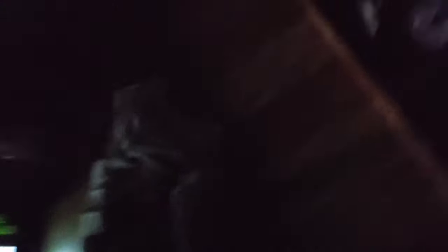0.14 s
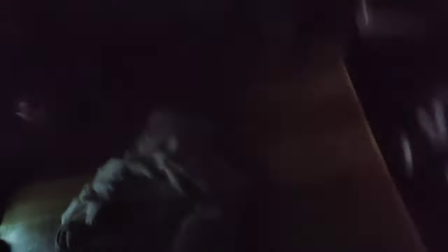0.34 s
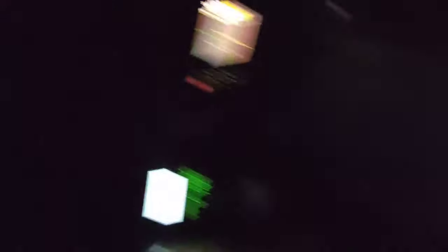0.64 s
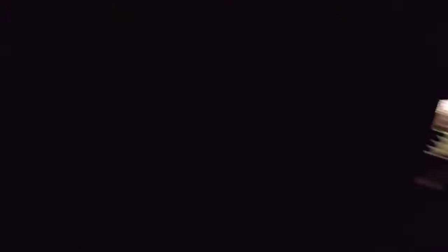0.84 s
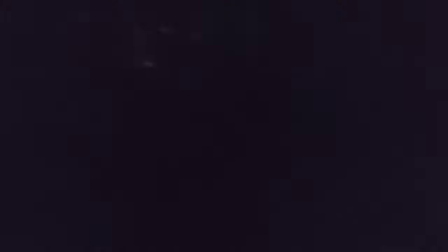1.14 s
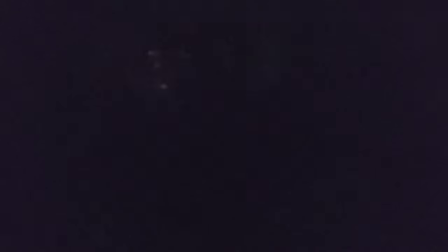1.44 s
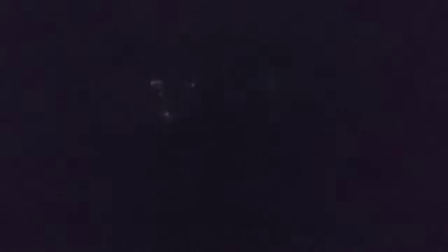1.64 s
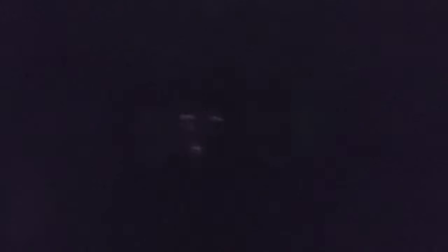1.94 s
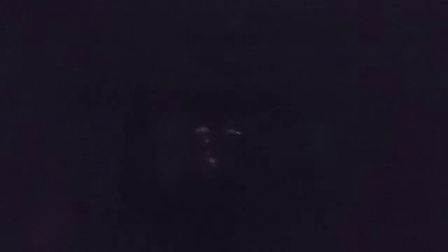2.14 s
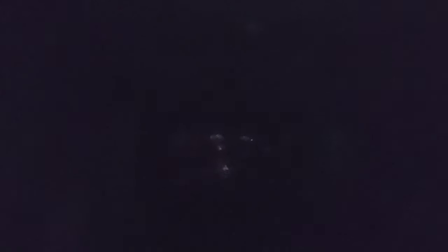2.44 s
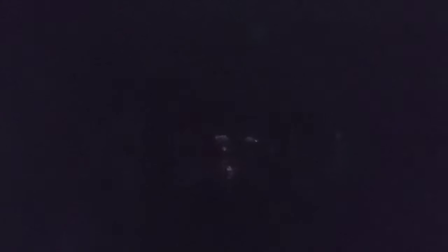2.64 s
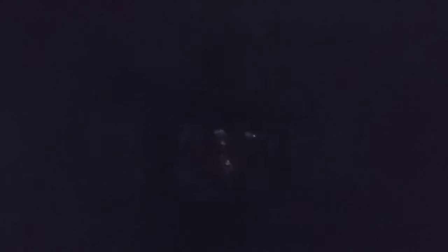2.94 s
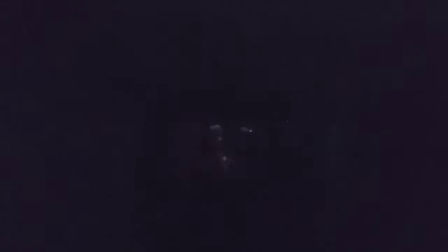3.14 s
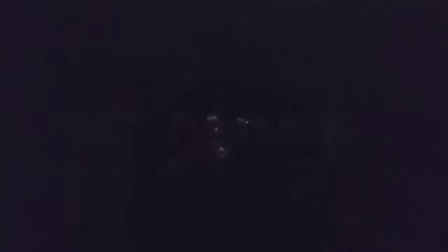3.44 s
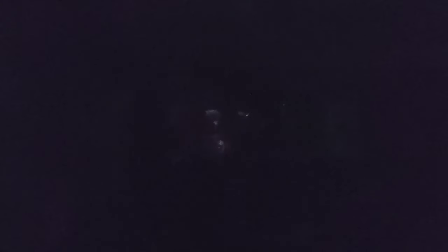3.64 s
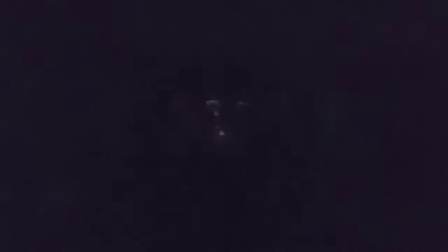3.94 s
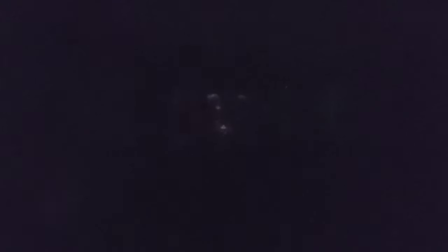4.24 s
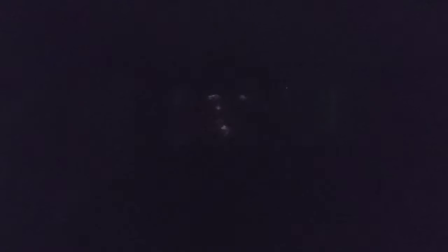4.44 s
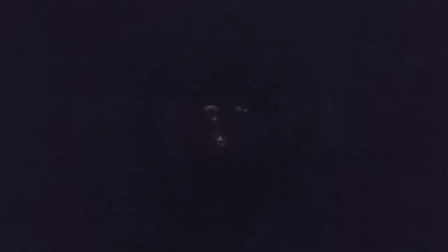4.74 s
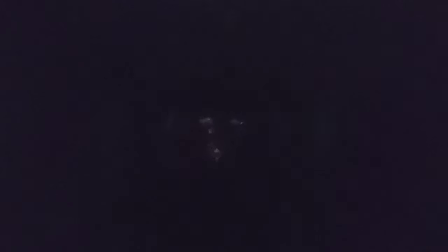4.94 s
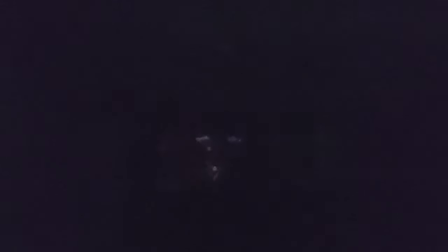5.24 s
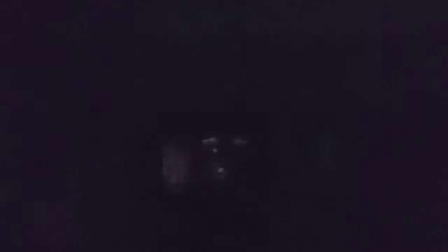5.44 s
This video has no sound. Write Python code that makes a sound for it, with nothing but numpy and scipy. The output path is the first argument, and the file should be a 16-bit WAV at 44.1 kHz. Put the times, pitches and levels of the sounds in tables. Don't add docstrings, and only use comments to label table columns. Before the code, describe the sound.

A heavy diesel drone fills a boat's wheelhouse at night, its low hum rising and sinking under gear whine and engine-room roar.

```python
import sys
import numpy as np
from scipy import signal
from scipy.io import wavfile
from scipy.ndimage import uniform_filter1d

SR = 44100
rng = np.random.default_rng(int(sys.argv[2]) if len(sys.argv) > 2 else 0)


def master(y):
    cut = np.clip(np.atleast_2d(y).T, -1, 1)
    pcm = np.round(cut * 32767)
    wavfile.write(sys.argv[1], SR, pcm.astype(np.int16))


def decibels_to_gain(level_db):
    exponent = np.asarray(level_db, float) / 20
    return 10 ** exponent


N = 246959
T = np.arange(N) / SR

CYCLE_HZ = 9.803
MESH_HZ = 196.1
PUMP_HZ = 195.7
SHAFT_WOBBLE_HZ = 3

# time in seconds, level in dB.
HULL_LEVEL = [(0, -23), (.26, -23), (.44, -33.5), (.8, -20.5), (1.38, -22.5), (1.54, -34), (1.68, -19.5),
              (2.24, -22), (2.4, -19), (2.82, -15.5), (3.08, -24.5), (3.22, -20), (3.45, -31.5),
              (3.85, -34), (4.2, -22), (4.78, -15), (5.18, -32.5), (5.32, -22)]
# time in seconds, pitch in Hz.
HULL_PITCH = [(0, 117.8), (.26, 117.8), (.44, 115.9), (.84, 117.3), (1.54, 118.3), (1.68, 118.2),
              (2.24, 116.5), (2.4, 117.4), (2.82, 117.7), (3.08, 117.6), (3.45, 118.8), (3.85, 116.6),
              (4.2, 117.4), (4.78, 117.45), (5.18, 118), (5.34, 117.3)]
STRONG_ORDER_DB = [-31, -31.5, -40]
# time in seconds, half length in seconds, # change in dB.
FLEX_9 = [
    (0.194, .3, -12),
    (0.71, 0.076, 7),
    (1.5, 0.32, 2.5),
    (3.775, .1, 3.5),
    (4.2, 0.066, 7.5),
    (5.05, 0.22, -11),
    (5.404, 0.17, 6.5),
]
FLEX_14 = [
    (.4, .65, -6),
    (1.68, 0.051, 6.5),
    (2.15, 0.16, 5.5),
    (3.02, 0.14, -15),
    (4.06, .08, 1),
]
FLEX_18 = [
    (.3, 0.48, 12.5),
    (.98, 0.093, -6),
    (2.15, 0.11, 10),
    (2.68, .35, -13),
    (3.32, 0.16, 9),
    (4.27, .12, 5.5),
]
# order, left level in dB, right level in dB.
WEAK_ORDERS = [(5.01, -55, -52), (6, -39.5, -40), (7, -41, -42.5), (7.9, -39, -39), (9.75, -43, -48.5),
               (11, -42, -38), (12.9, -43.5, -35), (14.6, -41, -42), (16.1, -52.5, -43), (17, -49, -51.5),
               (19.9, -59.5, -56.5), (21.7, -55.5, -37), (24.45, -46, -47.5), (24.4, -44.5, -42.5),
               (35, -45, -45), (41.6, -48.5, -53), (53.5, -45, -43.5), (56, -42, -50.5),
               (62.76, -43.5, -49), (66.1, -47.5, -46.5), (67.53, -50.5, -45.5), (68.55, -44, -44)]
# time in seconds, level in dB at the right port.
PANEL_LEVEL = [(0, -60), (.6, -50), (1.35, -43), (1.55, -35), (2.3, -31.5), (3.3, -31), (4, -34),
               (4.8, -29), (5.6, -34)]

# multiple of the gear rate, left level in dB, right level in
# dB.
GEAR_TONES = [(11, -59, -85), (12, -81, -59), (13, -64, -57), (15, -56, -77)]
GEAR_SONG_DB = [-40.5, -50, -41.5]
# time in seconds, half length in seconds, change in dB.
SONG_11 = [
    (0, 0.36, -18),
    (.85, .1, -19),
    (1.5, .2, -20),
    (1.9, 0.18, 3.5),
    (5.3, 0.13, -10),
    (5.299, 0.61, 4),
]
SONG_12 = [
    (0, 0.24, -15),
    (1.03, 0.054, 15),
    (1.9, 0.18, 4),
    (3.4, .25, -11),
    (5.1, 0.33, 12),
]
SONG_13 = [
    (.3, 0.47, -10.5),
    (1.25, 0.13, 1),
    (2.6, .15, -10),
    (3.35, 1, 1.5),
    (4.45, 0.4, -7),
    (5.4, .45, 6.5),
]

# multiple of the pump beat, left level in dB, right level in dB.
PUMP_TONES = [(22, -62.5, -68), (23, -57.5, -65.5), (24, -60.5, -69), (25, -66, -62), (26, -60, -58),
              (27, -60.5, -63), (28, -56.5, -66), (29, -56.5, -63), (30, -52, -66), (31, -62, -66),
              (32.7, -65, -78)]

# time in seconds, second multiple in Hz.
WHISTLE_PITCH = [(0, 6870), (.45, 6830), (1.1, 6835), (1.6, 6885), (1.85, 6865), (2.4, 6860), (3.05, 6830),
                 (3.22, 6875), (3.9, 6825), (4.6, 6840), (4.75, 6890), (4.9, 6850), (5.25, 6835),
                 (5.6, 6850)]
WHISTLE_DB = [-46, -59.5]
# time in seconds, half length in seconds, change in dB.
LEFT_FADES = [
    (0, 0.055, 9),
    (.45, .06, 9),
    (1.75, .3, -4),
    (3.14, 0.072, -8),
    (3.36, .05, -10),
    (3.68, .08, -22),
    (4.6, .2, -8),
    (4.98, .12, -9),
]
# time in seconds, half length in seconds, change in dB.
RIGHT_FLARES = [
    (.72, 0.088, 12),
    (1.3, .15, 7),
    (2.3, .1, -6),
    (2.97, .09, 8),
    (3.55, .1, 8),
    (3.81, 0.056, 9),
    (4.2, .2, -16),
    (4.8, 0.095, 5),
    (5.4, .08, 12),
]
# multiple of the shaft rate, left level in dB, right level in dB.
TURBINE_TONES = [(1, -60.5, -60), (3, -60.5, -62), (4, -62.5, -76)]

# time in seconds, peak in dB, pitch in Hz, length in seconds,
# left over right in dB.
TICKS = [
    (0.483, -35, 1548, .03, -1),
    (5.485, -39.5, 6350, 0.0031, 20.5),
]

# frequency in Hz, level in dB per Hz.
ROAR_LEFT = [(30, -62.5), (60, -57.5), (120, -48), (300, -57.5), (380, -54), (650, -58), (1400, -65),
             (2400, -58.5), (4000, -80), (6200, -74), (6900, -77), (8000, -88.5), (12000, -88.5),
             (15300, -89)]
# frequency in Hz, level in dB per Hz.
ROAR_RIGHT = [(30, -63.5), (110, -47.5), (300, -59.5), (380, -52), (700, -57.5), (1500, -66.5),
              (2700, -70.5), (4100, -84), (5700, -82), (7000, -80.5), (8300, -75.5), (11000, -90),
              (13800, -90.5), (15300, -99)]
# frequency in Hz, likeness from 0 to 1.
LIKENESS = [(40, 0.94), (130, 0.57), (290, 0.82), (640, .4), (1410, 0), (15000, 0.01)]

# shading before the swing
# in dB, middle in seconds, half length in seconds.
SWING = [
    (4, 0.88, 0.29),
    (-7, .95, .5),
    (-5.5, 1.92, .2),
    (-4.5, 1.85, .12),
]
# frequency in Hz, row of the swing counted from 1 (0 = never shaded).
SWING_BANDS = [(60, 0), (250, 1), (700, 0), (1500, 0), (2400, 2), (5500, 3), (8500, 0), (11000, 4)]
# frequency in Hz, level in dB per Hz.
FAINT_LIMIT = [(300, -76), (1200, -73), (2600, -83), (3700, -80.5), (4300, -80.5), (5800, -86),
               (7200, -79.5), (8500, -87), (9800, -85), (10600, -83.5), (12800, -83), (14200, -87.5),
               (15000, -86), (15450, -82), (15520, -40)]


def exhaust():
    cycles = CYCLE_HZ * T - .52 + 0.0068 * wander(.5).real
    pitch_hz = columns(HULL_PITCH, T)[0]
    hull_turns = np.cumsum(pitch_hz) / SR - .127
    hull = decibels_to_gain(columns(HULL_LEVEL, T)[0]) * tone(hull_turns, steady=0.99, width_hz=4.8).real
    for order, db, flex in zip((9, 14, 18), STRONG_ORDER_DB, (FLEX_9, FLEX_14, FLEX_18)):
        hull -= decibels_to_gain(db + bumps(flex)) * tone(order * cycles, steady=0.94, width_hz=3.).real
    out = hull * decibels_to_gain(np.array([[-1.1], [.9]]))

    shade = swing(T)
    for order, *db in WEAK_ORDERS:
        steady = 0.74 * np.exp(-(order / 38) ** 2)
        shaded = decibels_to_gain(1.22 * shade_db(shade, np.array([order * CYCLE_HZ])))
        hum = tone(round(order) * cycles, steady, width_hz=1.4 + order / 12).real
        out -= decibels_to_gain(np.array(db))[:, None] * shaded * hum

    panel = decibels_to_gain(columns(PANEL_LEVEL, T)[0]) * tone(72 * CYCLE_HZ * T, steady=0.95, width_hz=13.0)
    left_panel = decibels_to_gain(-14.5) * panel * np.exp(-.8j)
    return out + [left_panel.real, panel.real]


def gears():
    hz = MESH_HZ * (1 + .0008 * wander(5.07).real + .002 * wander(0.802).real)
    out = whine(hz, GEAR_TONES, steady=0.22, width_hz=10)
    turns = np.cumsum(hz) / SR
    for k, db, song in zip((11, 12, 13), GEAR_SONG_DB, (SONG_11, SONG_12, SONG_13)):
        out[0] += decibels_to_gain(db + bumps(song)) * tone(k * turns, steady=0.94, width_hz=11).real
    return out


def pump():
    rocking = 0.0024 * np.cos(4 * np.pi * CYCLE_HZ * T)
    hz = PUMP_HZ * (1 + .002 * wander(2.).real + rocking)
    return whine(hz, PUMP_TONES, steady=.45, width_hz=11.6)


def turbine():
    hz = columns(WHISTLE_PITCH, T)[0] / 2 + SHAFT_WOBBLE_HZ * wander(3.).real
    turns = 2 * np.cumsum(hz) / SR
    left_db = WHISTLE_DB[0] + 2.1 * swing(T)[2] + bumps(LEFT_FADES)
    right_db = WHISTLE_DB[1] + bumps(RIGHT_FLARES)
    second = [decibels_to_gain(db) * tone(turns, steady=0.83, width_hz=20).real for db in (left_db, right_db)]
    return second + whine(hz, TURBINE_TONES, steady=0.6, width_hz=33)


def ticks():
    out = np.zeros((2, N))
    for s, db, hz, length, pan_db in TICKS:
        blip = np.exp(-(2 * (T - s) / length) ** 2) * np.sin(2 * np.pi * hz * T)
        out += decibels_to_gain(db + np.array([[.5], [-.5]]) * pan_db) * blip
    return out


def roar():
    size, hop = 2048, 512
    frames, hz = N // hop + 5, np.fft.rfftfreq(size, 1 / SR)
    a, b, c, d, patches = rng.standard_normal((frames, len(hz), 5)).T
    patches = uniform_filter1d(patches, size=20, axis=0)
    patches = evened(uniform_filter1d(patches, size=8, axis=1))

    same = np.clip(read(LIKENESS, hz), -1, 1)[:, None]
    left = a + 1j * b
    z = np.array([left, same * left + np.sqrt(1 - same ** 2) * (c + 1j * d)])
    shade = swing(np.arange(frames) * hop / SR)
    right_gain = decibels_to_gain(read(ROAR_RIGHT, hz))[:, None]
    deep = hz < 60
    z[0] *= decibels_to_gain(read(ROAR_LEFT, hz)[:, None] + shade_db(shade, hz))
    z[0, deep] = z[1, deep] * right_gain[deep]
    z[1] *= right_gain
    z *= decibels_to_gain(14.0 + 0.65 * patches)
    noise = signal.istft(z, nperseg=size, noverlap=size - hop)[1][:, :N]

    body = signal.sosfiltfilt(signal.butter(2, 2600, fs=SR, output="sos"), noise)
    bass = signal.sosfiltfilt(signal.butter(2, 260, fs=SR, output="sos"), noise)
    breath = 0.092 * np.cos(4 * np.pi * (CYCLE_HZ * T - .25))
    breath += 0.1 * np.cos(2 * np.pi * (CYCLE_HZ * T - .75))
    thumps = 0.32 * np.cos(4 * np.pi * (CYCLE_HZ * T - .02))
    return noise + bass * thumps + body * (breath + 0.044 * wander(11).real)


def whine(hz, tones, steady, width_hz):
    turns, shade, out = np.cumsum(hz) / SR, swing(T), np.zeros((2, N))
    for k, left_db, right_db in tones:
        spin = np.sqrt(2) * np.exp(2j * np.pi * round(k) * turns)
        shaded_db = left_db + shade_db(shade, np.array([k * hz.mean()]))[0]
        out[0] += decibels_to_gain(shaded_db) * (spin * drift(steady, width_hz)).real
        out[1] += decibels_to_gain(right_db) * (spin * drift(steady, width_hz)).real
    return out


def tone(turns, steady, width_hz):
    return np.sqrt(2) * np.exp(2j * np.pi * turns) * drift(steady, width_hz)


def drift(steady, width_hz):
    steady = np.clip(steady, 0, 1)
    return steady + np.sqrt(1 - steady ** 2) * wander(width_hz)


def wander(width_hz):
    step = 64
    size = N // step + 2
    bell = np.exp(-(np.fft.fftfreq(size, step / SR) / width_hz) ** 2)
    z = rng.standard_normal((size, 2)) @ [1, 1j] * bell
    return np.interp(np.arange(N), np.arange(size) * step, evened(np.fft.ifft(z)))


def bumps(rows):
    t = T[::64]
    total_db = sum(db * np.exp(-((t - s) / half) ** 2) for s, half, db in rows)
    return np.interp(T, t, total_db)


def swing(t):
    db, s, half = np.transpose(SWING)[:, :, None]
    return db * (1 - np.tanh((t - s) / half)) / 2


def shade_db(shade, hz):
    weights = [read([(f, row == k) for f, row in SWING_BANDS], hz) for k in (1, 2, 3, 4)]
    return np.transpose(weights) @ shade


def columns(rows, t):
    s, *values = np.transpose(rows)
    return np.array([np.interp(t, s, v) for v in values])


def read(points, hz):
    f, value = np.transpose(points)
    return np.interp(np.log(hz + 1), np.log(f + 1), value)


def evened(x):
    return x / np.sqrt(np.mean(abs(x) ** 2))


def lose_faint_detail(x):
    size, start, band = 1024, 175, 16
    n, k = np.arange(2 * size) + .5, np.arange(size) + .5
    window = np.sin(np.pi * n / (2 * size))
    basis = np.sqrt(2 / size) * window * np.cos(np.pi / size * np.outer(k, n + size / 2))
    padding = (2 * size - start, 2 * size - (N - start) % size)
    halves = np.pad(x, ((0, 0), padding)).reshape(2, -1, size)
    lines = np.concatenate([halves[:, :-1], halves[:, 1:]], axis=2) @ basis.T

    jumps = rng.standard_normal((*lines.shape[:2], size // band))
    jumps = evened(uniform_filter1d(jumps, size=2, axis=1))
    jumps_db = 2.0 * jumps + 3.8 * jumps.mean(0)
    hz = k * SR / (2 * size)
    limit_db = read(FAINT_LIMIT, hz) + 10 * np.log10(SR / 2) + np.repeat(jumps_db, band, axis=2)
    shade = swing((np.arange(lines.shape[1]) - 1) * size / SR)
    limit_db += shade_db(shade, hz).T * (k > 440)

    step = decibels_to_gain(limit_db) / .6
    rounded = np.sign(lines) * np.floor(abs(lines) / step + .4) * step
    back = rounded @ basis
    joined = (back[:, 1:, :size] + back[:, :-1, size:]).reshape(2, -1)
    return joined[:, size - start:][:, :N]


def scene():
    return exhaust() + gears() + pump() + turbine() + ticks() + roar()


def band_limit(x):
    return signal.sosfilt(signal.butter(12, 15820, fs=SR, output="sos"), x)


def record(dry):
    mix = lose_faint_detail(dry)
    return band_limit(mix)


dry = scene()
out = record(dry)
master(out)
```